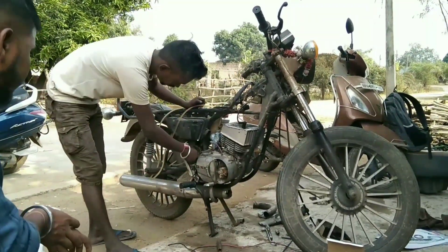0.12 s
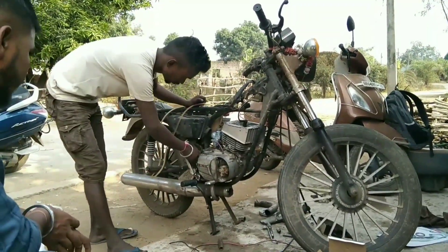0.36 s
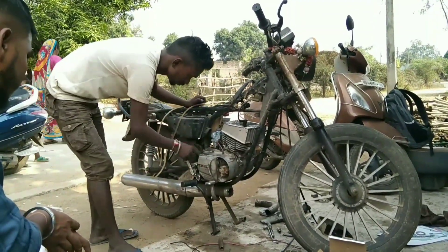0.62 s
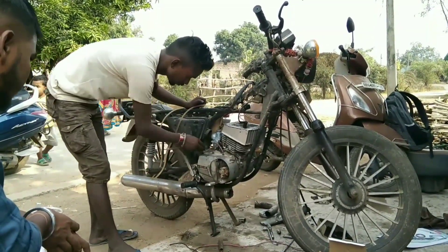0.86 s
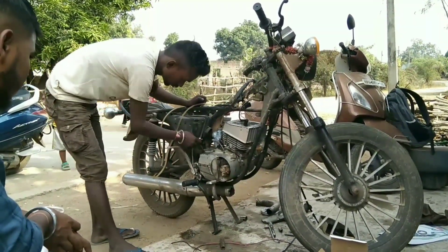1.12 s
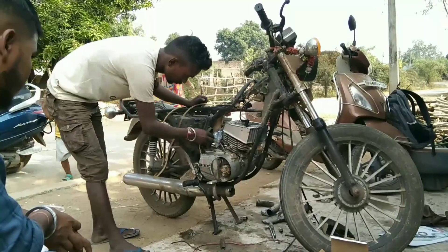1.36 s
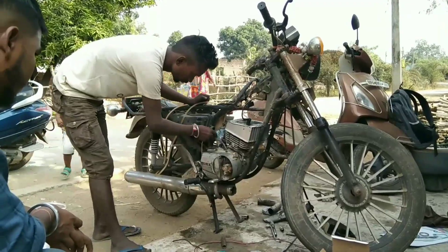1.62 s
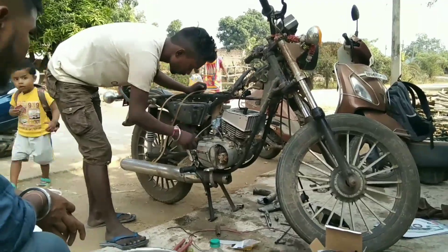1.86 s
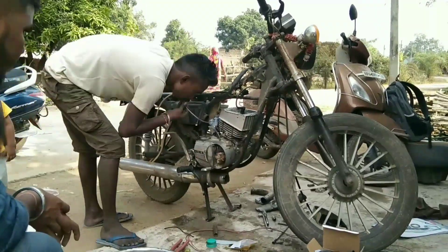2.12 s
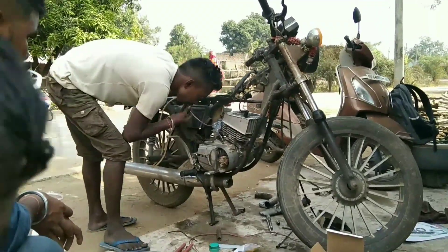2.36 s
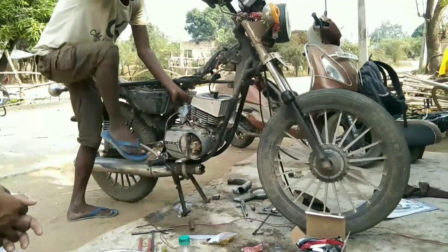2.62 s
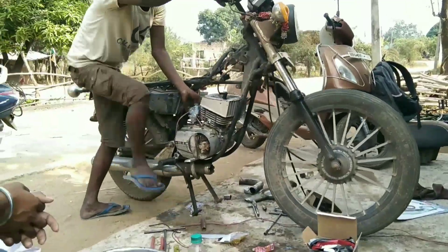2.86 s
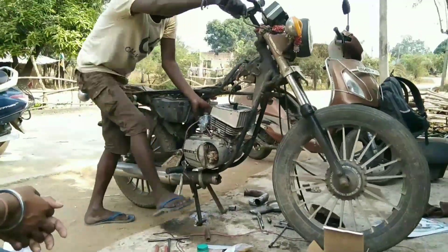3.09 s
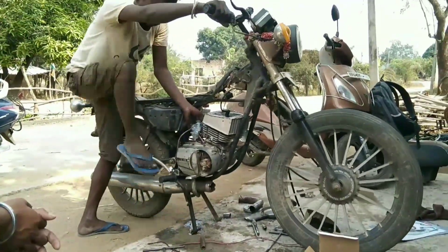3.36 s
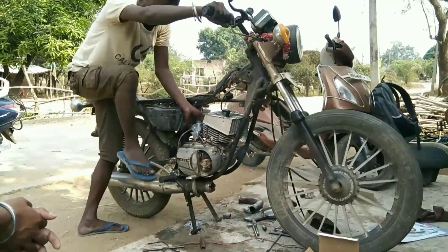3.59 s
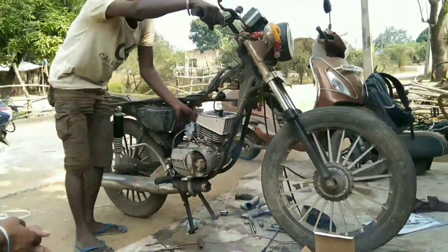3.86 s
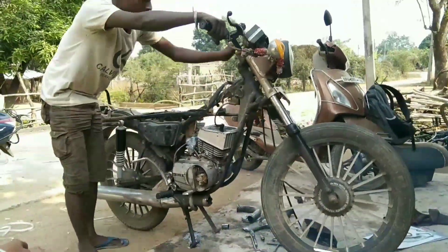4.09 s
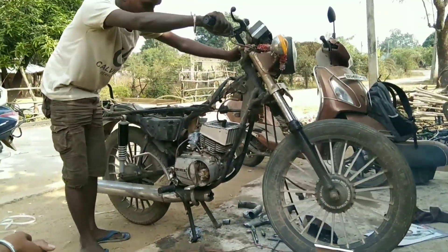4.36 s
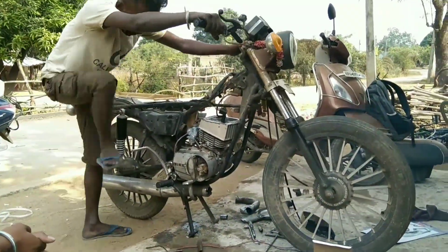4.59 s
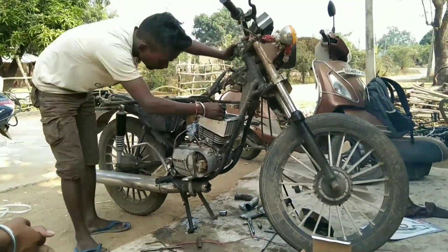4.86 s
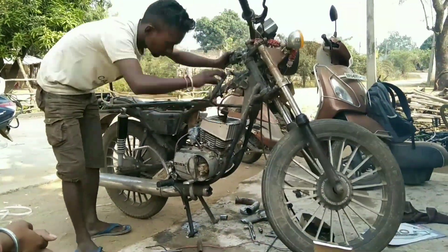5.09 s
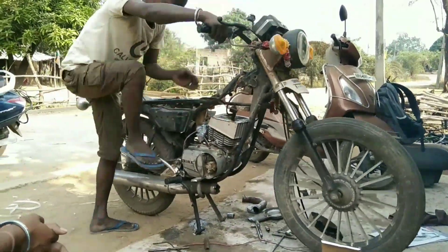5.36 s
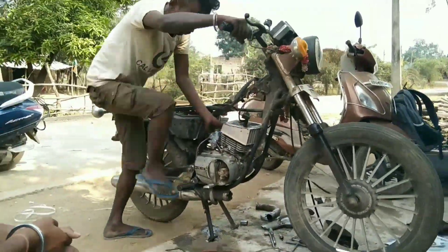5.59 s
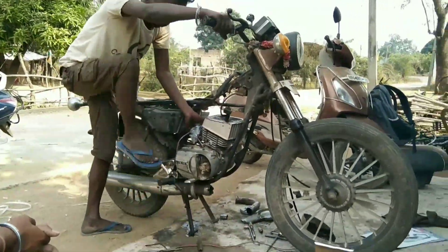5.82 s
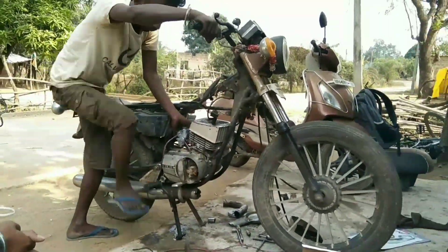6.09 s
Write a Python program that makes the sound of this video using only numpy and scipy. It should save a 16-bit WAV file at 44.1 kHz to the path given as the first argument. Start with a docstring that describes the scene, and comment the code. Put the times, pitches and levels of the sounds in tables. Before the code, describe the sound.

Close, nearly mono phone pickup outdoors: sandy scraping and light tinkling over faint traffic rumble, then metallic kick clacks and soft exhaust puffs. Uneven barking pops bunch together into a brief, very loud two-stroke buzz, which loses its firing suddenly and slows through hollow puffs and clatter. The yard is quiet again with a few scuffs and a small squeak, before further knocking kicks with a weak misfire but no start.

```python
"""Scuffs and small metal jingles close by in an open yard, over distant traffic rumble; then kicks on an engine.
A single-cylinder two-stroke on its stand pops, catches, revs up, coasts to a stop and is kicked again.
Blasts are gliding whistles and impulses through exhaust resonances; puffs, knocks and bells are decaying rings.
Rattle, scuffs, traffic and hiss are shaped noise; the short squeaks are unsteady partials.
All reaches a nearly mono phone microphone, with a short echo of the engine from the ground."""
import sys
import numpy as np
from scipy import signal
from scipy.fft import rfft, irfft, next_fast_len
from scipy.io import wavfile
from scipy.ndimage import uniform_filter1d, map_coordinates

SR = 44100
rng = np.random.default_rng(int(sys.argv[2]) if len(sys.argv) > 2 else 0)


def undo_db(level):
    """Turn decibels back into plain size, where 20 dB means ten times bigger."""
    steps = np.asarray(level, float) / 20
    return 10 ** steps


def file_out(sig):
    """Save sig as 16-bit WAV at sys.argv[1]."""
    # one column per channel
    cols = np.atleast_2d(sig).T
    # limit, then scale
    lim = np.clip(cols, -1, 1)
    pcm = np.round(lim * 32767).astype(np.int16)
    wavfile.write(sys.argv[1], SR, pcm)


N = 273861
T = np.arange(SR // 8) / SR  # time inside one short sound, s
CLOCK = np.arange(N) / SR  # time in the whole scene, s

# Single pops from the exhaust before and around the catch, and in the last kick.
# Each row: start in seconds, relative bark level in dB, bark pitch in Hz, bark length in seconds,
# relative puff level in dB.
POPS = [(3.4907, -10, 1555, 0.0068, -3.5), (3.582, -11, 1840, 0.0046, -4.5), (3.654, -6, 1470, 0.0021, -5),
        (3.6814, -5, 1640, 0.0025, -12.5), (3.7017, -6, 1920, 0.0032, -7.5), (3.723, -2, 1855, 0.0027, -14),
        (3.7576, -5, 1950, 0.0023, -11), (3.787, -5, 1810, 0.0033, -8), (3.816, -6, 1850, 0.0026, -5),
        (3.8444, -6.5, 1900, 0.0027, -12.5), (3.858, -9.5, 2050, 0.0043, -6),
        (5.672, -8, 1544, 0.0058, -8.5), (5.72, -15, 2050, 0.0046, -8.5)]
CUT_S, STALL_S = 4.078, 4.295  # the ignition is cut; after the stall the last slow turns give no running puffs


def engine():
    """Exhaust and intake over the rattle of the case; each blast throws a spray of treble."""
    # Rattle colour of the case. Each row: frequency in Hz, relative level in dB.
    case = [(120, -1), (200, 5), (228, -6.5), (320, 6.5), (518, -7.5), (613, -10), (775, -9), (1020, -9.5),
            (1900, -9.5), (2570, -12.5), (2850, -14), (3330, -22), (4500, -68), (5850, -61.5), (9900, -120)]
    # Turbulent exhaust gas. Each row: frequency in Hz, relative level in dB.
    churn = [(150, -31), (300, -5), (520, -5.5), (800, -6.5), (1050, -9.5), (1500, -5), (2000, -3),
             (2800, -5.5), (3400, -14), (4500, -38.5), (9900, -120)]
    # Treble of the engine. Each row: frequency in Hz, relative level in dB.
    treble = [(2240, -54), (3800, -10), (5520, -17), (6850, -13), (10300, -18), (12000, -14),
              (15500, -25.5)]
    wake_s = 0.0087  # life of the churn after a blast
    kick, kick_blast = kicked()
    run, run_blast = running()
    rattle_db, treble_db = rattle_levels()
    # teeth and rings strike in clumps
    clumps = unit(np.convolve(rng.standard_normal(N), np.hanning(64), "same"))
    grains = unit(undo_db(1.65 * clumps))

    # while it fires, the gas drowns the low knock of the case
    firing = (CLOCK > POPS[3][0]) & (CLOCK < STALL_S)
    colour = np.where(firing, noise(churn, patchy_db=5.5), noise(case, patchy_db=5.5))
    rattle = undo_db(rattle_db) * grains * colour
    gas = 0.05 * kick_blast * noise(churn, patchy_db=1.5)
    # hot gas goes on churning in the pipe
    decay = np.exp(-T / wake_s) / (wake_s * SR)
    wake = np.convolve(kick_blast + 0.35 * run_blast, decay)[:N]
    gas = gas + 0.065 * wake * noise(churn, patchy_db=4)

    spray = undo_db(treble_db - 6.5) * (grains + 5 * kick_blast + 3 * run_blast)
    bright = spray * noise(treble, patchy_db=1.5)
    aside = spray * noise(treble, patchy_db=3)
    # the pipe and the heavy parts give little treble
    dull = filtered(kick + run, lambda hz: (1 + 1j * hz / 4200) ** -4)
    motor = dull + rattle + gas + drags() * grains + bright
    return motor, aside + undo_db(rattle_db - 20.5) * noise(case, patchy_db=15.5)


def running():
    """One port opening a turn: a firing rings the pipe, an unfired turn puffs; the intake rings later in the turn."""
    # Crank speed once the engine fires on every turn. Each row: time in seconds, speed in turns per second.
    crank = [(3.8447, 71.9), (3.93, 75.7), (4.01, 78.8), (4.08, 76.5), (4.14, 69.0), (4.2, 59.1),
             (4.26, 43.0), (4.31, 40), (4.335, 26), (4.345, 19), (4.39, 20), (4.415, 14)]
    # Turns with a poor charge, counted from 0.
    weak_turns = [0, 1, 2, 9, 18]
    weak_db = -8
    fire_start_db, fire_dies_db_per_s = -9.5, 597
    pipe_dies_db_per_s = 60  # hot gas rings the pipe for some turns more
    puff_fired_db, puff_coast_db, puff_grows_s = -22.5, -1.5, 0.15  # the unfired puff takes over after the cut
    puff_hz, puff_hz_per_turn = 85, 3.4  # a faster port gives a shorter slug; rise per turn/s
    intake_fired_db, intake_coast_db, intake_fades_db_per_s = -25.5, -14, 9
    intake_db_per_turn, slow_turns_per_s = 4.2, 41.6  # a slow crank sucks weakly; dB per missing turn/s
    intake_lag_turns, intake_attack_s = .41, .0012

    speed = curves(crank, 0)[0]
    angle = np.cumsum(speed) / SR
    since = np.maximum(CLOCK - CUT_S, 0)
    coast = np.clip(since / puff_grows_s, 0, 1)
    fire_db = fire_start_db - fire_dies_db_per_s * since
    puff_db = puff_fired_db + (puff_coast_db - puff_fired_db) * np.sqrt(coast)
    intake_db = np.where(since > .012, intake_coast_db - intake_fades_db_per_s * since, intake_fired_db)
    intake_db = intake_db - intake_db_per_turn * np.maximum(slow_turns_per_s - speed, 0)
    turns = np.arange(int(angle[-1]) + 1)
    opens = np.searchsorted(angle, turns + 1e-6)
    sucks = np.searchsorted(angle, turns + intake_lag_turns)
    size_db = fire_db[opens] + weak_db * np.isin(turns, weak_turns) + rng.normal(0, 1.0, len(turns))

    out, fires, blast = np.zeros(N), np.zeros(N), np.zeros(N)
    for i, db in zip(opens, size_db):
        s = i / SR
        add(out, s - .0002, undo_db(db + 3) * bark(1740, .0015, rough=.015, attack=.00012))
        # the blast's higher second half
        add(out, s + 0.0014, -undo_db(db - 5) * bark(2200, .0026, rough=.03, attack=.00012))
        # the slow push of the charge
        add(out, s + 0.0004, undo_db(db - 8.5) * np.hanning(150))
        pipe_db = db + 11.5 + (fire_dies_db_per_s - pipe_dies_db_per_s) * since[i]
        add(fires, s + .0001, undo_db(pipe_db) * np.hanning(11))
        if i < STALL_S * SR:
            slug = puff(puff_hz + puff_hz_per_turn * speed[i], cycles=7.1)
            add(out, s, undo_db(puff_db[i] - 2.5) * slug)
        # the suction wave comes back from the cone
        add(out, s + 0.00387, -undo_db(db - 11.5) * np.hanning(44))
        add(blast, s, undo_db(db + 6) * (T / .0011) * np.exp(1 - T / .0011))
    for i in sucks[sucks < STALL_S * SR]:
        gulp = ring(rng.normal(1490, 10), 0.015, intake_attack_s) + 0.13 * ring(2840, 0.06, 0.003)
        add(out, i / SR, undo_db(intake_db[i] + 9.5 + rng.normal(0, 1)) * gulp)
    out = out + filtered(fires, pipe)
    return filtered(out, lambda hz: (1j * hz / (70 + 1j * hz)) ** 2), blast


def kicked():
    """Pops, puffs and knocks, with the gate that each pop and knock puts on the gas noise."""
    pop, pop_blast = single_pops()
    knock, knock_blast = knocks()
    return pop + unfired_puffs() + knock, pop_blast + knock_blast


def single_pops():
    """A lone firing whistles at the outlet, rings the pipe and puffs; its wave runs the pipe and comes out again."""
    return_s = .0185
    out, blast, fires = np.zeros(N), np.zeros(N), np.zeros(N)
    for s, db, hz, length, puff_db in POPS:
        add(out, s, undo_db(db) * bark(hz, length, rough=.035, attack=.00012))
        add(out, s + 0.004, undo_db(puff_db) * puff(300, cycles=5))
        add(out, s + return_s, undo_db(db - 9) * puff(340, cycles=4))
        add(fires, s + 0.00027, undo_db(db + 7) * np.hanning(11))
        add(blast, s, undo_db(db + 18.5) * (T / 0.0032) * np.exp(1 - T / 0.0018))
    return out + filtered(fires, pipe), blast


def unfired_puffs():
    """Gas pushed out without a firing: low swings, repeated more weakly as they return through the pipe."""
    # Puffs while kicked over and near the stop. Each row: time in seconds, relative level in dB, pitch in Hz.
    puff_rows = [(2.565, -15, 156), (2.566, -12, 323), (2.592, -30, 245), (2.745, -23.5, 364),
                 (2.775, -38, 326), (2.722, -20, 172), (2.91, -23.5, 188), (2.952, -22.5, 325),
                 (3.073, -30.5, 297), (3.095, -23.5, 176), (3.146, -29, 137), (3.222, -37.5, 153),
                 (3.283, -28.5, 260), (3.358, -39.5, 200), (3.44, -21, 165), (3.463, -17, 282),
                 (3.54, -13, 166), (3.564, -14.5, 288), (3.617, -16, 174), (4.304, -16, 228),
                 (4.33, -13.5, 179), (4.378, -14, 332), (4.383, -14, 197), (5.725, -16.5, 192),
                 (4.411, -27.5, 183), (5.643, -37.5, 173), (5.693, -12, 348), (5.997, -31.5, 199),
                 (5.928, -14.5, 186), (5.93, -25.5, 373), (6.145, -11, 191), (6.148, -27, 375)]
    swell_s = 0.00493  # a slowly opened port lets the puff build up over its first swings
    return_s, return_db = .026, -12.5  # delay and loss of each return
    thump_hz, thump_db = 107.2, -2  # the piston's slow push under each puff
    out = np.zeros(N)
    for s, db, hz in puff_rows:
        for k in range(3):
            slug = puff(hz, cycles=7.87, attack=swell_s)
            add(out, s - swell_s + k * return_s, undo_db(db + 11.0 + k * return_db) * slug)
        add(out, s - swell_s, undo_db(db + thump_db) * ring(thump_hz, 0.089, swell_s))
    return out


def knocks():
    """A blow on the kick lever or gears, or a weak unfired pop, rings the metal modes nearest its pitch, with a
    short crack."""
    # Knocks: blows on the kick lever or gears, and weak unfired pops ringing the same metal. Each row: time in
    # seconds, relative level in dB, pitch of the blow in Hz.
    knock_rows = [(2.452, -34, 1900), (2.515, -32, 2890), (2.543, -22, 1345), (2.5523, -15, 2440),
                  (2.5645, -4, 1900), (2.586, -9.5, 2050), (2.602, -26, 2800), (2.74, -15.5, 1345),
                  (2.793, -32, 1345), (2.8903, -22, 1430), (2.9168, -14.5, 1050), (2.968, -15.5, 2050),
                  (3.076, -17.5, 1345), (3.1032, -17, 1050), (3.1127, -9, 2890), (3.2545, -24, 1050),
                  (3.28, -20.5, 1500), (3.3, -13, 2890), (3.461, -3.5, 1420), (3.541, -9, 2290),
                  (4.1508, -11.5, 845), (4.305, -7.5, 2290), (4.329, -9.5, 2050), (4.3545, -11, 1500),
                  (4.378, -7, 2070), (4.431, -30.5, 2890), (4.7476, -34, 1050), (5.0816, -24.5, 1500),
                  (5.647, -11.5, 1500), (5.688, -7.5, 2050), (5.692, -19, 2890), (5.707, -9.5, 1500),
                  (5.7396, -13, 1500), (5.925, -3.5, 2290), (5.95, -11, 1500), (5.9768, -12.5, 1500),
                  (6.143, -2, 2390), (6.169, -9, 1500)]
    # Modes of the kick lever and gear case. Each row: frequency in Hz, relative level in dB, t60 in seconds.
    gear_modes = [(845, -1.5, 0.056), (1050, 1, 0.0089), (1345, 1.5, 0.017), (1500, -1.5, 0.016),
                  (1900, -3.5, 0.017), (2050, 6.5, 0.013), (2290, -4, 0.0087), (2450, -5, 0.02),
                  (2920, -34.5, 0.063), (2890, 1, 0.033)]
    aim_db_per_octave = 110  # a blow favours the modes near its own pitch
    out, blast = np.zeros(N), np.zeros(N)
    for s, db, hz in knock_rows:
        grit = .9 + .3 * stepped(30)  # sliding contact
        modes = np.zeros(len(T))
        for f, level, t60 in gear_modes:
            aimed_db = level - aim_db_per_octave * abs(np.log2(f / hz))
            modes += undo_db(aimed_db) * ring(f, t60, 0.0027)
        add(out, s, undo_db(db + 2.5) * modes * grit)
        crack = undo_db(-60 * T / 0.042) * (1 - np.exp(-T / 0.0037)) * rng.standard_normal(len(T))
        add(out, s, undo_db(db - 10.0) * crack)
        add(blast, s, undo_db(db + 8) * (T / 0.0033) * np.exp(1 - T / 0.0017))
    return out, blast


def rattle_levels():
    """Rattle and treble in dB: every slow stroke rises, holds and falls alike; the running engine follows its work."""
    # How hard the engine works from the catching kick to the stop.
    # Each row: time in seconds, relative rattle level in dB.
    work = [(3.4, -79.5), (3.44, -35), (3.5, -31.5), (3.59, -20.5), (3.7, -28.5), (3.85, -29), (4.05, -30),
            (4.15, -31), (4.18, -35.5), (4.3, -32.5), (4.36, -32), (4.39, -35.5), (4.42, -40), (4.46, -57)]
    # Slow compression strokes drag gears and rings and push gas.
    # Each row: time in seconds, relative rattle level in dB, hold in seconds, treble under rattle in dB.
    strokes = [(2.553, -27.5, 0.004, 28.5), (2.581, -42, 0.014, 14), (2.72, -34, 0.049, 23.5),
               (2.897, -37.5, 0.058, 22.5), (3.107, -29, 0.0044, 13.5), (3.289, -34, 0.023, 14),
               (5.68, -20.5, 0.02, 24.5), (5.753, -40, 0.022, 22), (5.93, -36.5, 0.036, 19),
               (5.98, -50.5, 0.027, 13), (6.148, -30, .02, 22.5)]
    rise_db_per_s, fall_db_per_s = 605, 366
    treble_drop = 1.6  # dB of treble lost for each dB the rattle is under its peak
    work_dull_db, coast_dull_db = 17.5, 4.5  # treble lies under the work, more so after the cut
    work_db, = curves(work, -99)
    levels = [[work_db, work_db - work_dull_db - coast_dull_db * (CLOCK > CUT_S)]]
    for s, db, hold, under_db in strokes:
        drop_db = rise_db_per_s * np.maximum(s - CLOCK, 0)
        drop_db = drop_db + fall_db_per_s * np.maximum(CLOCK - s - hold, 0)
        levels.append([db - drop_db, db - under_db - treble_drop * drop_db])
    return np.max(levels, axis=0)


def drags():
    """The kick pawl bites before a stroke: each bite starts at once, grinds for a moment and fades."""
    # Bites of the pawl. Each row: start in seconds, relative level in dB, fading time in seconds.
    bites = [(2.696, -45, 0.038), (2.874, -67, 0.013), (3.424, -37.5, 0.056), (5.607, -40.5, 0.014),
             (5.896, -44.5, 0.045), (6.108, -38.5, 0.028)]
    # Colour of the grinding. Each row: frequency in Hz, relative level in dB.
    pawl = [(600, -32), (1100, -4), (2400, -4.5), (3500, -5), (4500, -33), (9000, -47), (16000, -46)]
    gate = np.zeros(N)
    for s, db, length in bites:
        add(gate, s, undo_db(db) * (1 - np.exp(-T / .001)) * np.exp(-np.square(T / length)))
    return gate * noise(pawl, patchy_db=3.5)


def puff(hz, cycles=6, attack=0.00096):
    """A slug of gas leaves the pipe: two decaying low swings sounding together."""
    return ring(hz, cycles / hz, attack) + .65 * ring(hz * 0.637, cycles / hz, 2 * attack)


def bark(hz, length, rough, attack):
    """The outlet whistles while the blast passes, then is choked off."""
    rises_per_s = 18  # share of pitch gained a second
    glide = np.cumsum(hz * (1 + rises_per_s * T + rough * stepped(20))) / SR
    choked = .15 * np.exp(-(T - length) / .0014)
    gate = (1 - np.exp(-T / attack)) * np.where(T < length, 1, choked)
    return gate * (np.sin(2 * np.pi * glide) + 0.3 * np.sin(2 * np.pi * 1.43 * glide))


def pipe(f):
    """Response of the hot exhaust: resonances of alternating sign."""
    # Resonances of the pipe. Each row: frequency in Hz, width in Hz, relative level in dB.
    resonances = [(349, 57, 10), (530, 48, 3.5), (813, 72, 10), (1310, 41, -5.5), (1850, 150, -23),
                  (2270, 61, -1.5), (2800, 180, -18)]
    total = 0
    for k, (centre, width, db) in enumerate(resonances):
        total = total + (-1) ** k * undo_db(db) * 1j * f * width / (centre ** 2 - f * f + 1j * f * width)
    return total


def ground(x):
    """A short diffuse answer from the ground, parked machines and trees, thin in the bass."""
    tail = rng.standard_normal(len(T)) * undo_db(-60 * T / 0.07)
    delayed = np.pad(tail / np.linalg.norm(tail), (120, 0))  # 120 samples late
    echo = signal.fftconvolve(x, delayed)[:N]
    return filtered(echo, lambda hz: 1j * hz / (400 + 1j * hz))


def scuffs():
    """Steps scrape on gritty ground: uneven noise in a band, with a fine sandy top, swelling and fading."""
    # Scuffs close by. Each row: start in seconds, relative level in dB, centre in Hz, length scale in seconds.
    scuff_rows = [(0.016, -23.5, 3300, 0.056), (0.56, -51, 7000, .03), (0.837, -49, 6000, 0.027),
                  (1.098, -56, 6440, 0.023), (1.604, -52, 8100, 0.037), (0.67, -24.5, 2880, 0.042),
                  (0.749, -42.5, 3380, 0.087), (0.883, -33, 3680, 0.064), (0.977, -35, 3000, 0.03),
                  (1.017, -31, 3240, 0.053), (1.171, -26, 3700, 0.032), (1.273, -23, 2900, 0.046),
                  (1.386, -19.5, 2590, 0.011), (1.398, -26, 2450, 0.018), (1.654, -28.5, 2940, 0.046),
                  (1.707, -32, 3130, 0.084), (1.493, -37, 3170, 0.032), (1.814, -28, 1050, 0.074),
                  (1.817, -25.5, 2680, 0.086), (4.49, -35.5, 2270, 0.073), (4.717, -56, 2470, 0.29),
                  (4.956, -32, 2500, 0.077), (5.35, -35, 2030, 0.027), (5.474, -40, 2060, 0.17)]
    sand_db = -14.5  # the fine top, under the body
    out = np.zeros(N)
    t = T[:96]
    for s, db, hz, length in scuff_rows:
        grit = rng.standard_normal(len(T)) * undo_db(4.5 * stepped(40))
        grain = np.sin(2 * np.pi * hz * t) * (t * hz) ** 2 * np.exp(-t * hz * 3)
        body = unit(np.convolve(grit, grain)[:len(T)])
        sand = unit(np.convolve(grit, np.ones(3), "same"))
        swell = np.square(T / (0.42 * length) * np.exp(1 - T / (0.31 * length)))
        add(out, s, undo_db(db - 18.5) * unit(body + undo_db(sand_db) * sand) * swell)
    return out


def jingles():
    """Small metal parts ring like bells, clearly or in faint random tinkles with shaken grit under them."""
    # The clearest jingles. Each row: start in seconds, relative level in dB, which bell counted from 0.
    clear = [(.026, -40, 2), (.028, -44, 3), (.676, -44, 2), (.678, -46, 3), (.68, -46, 4), (.6216, -62, 5),
             (1.197, -56, 1), (1.42, -52, 1), (1.448, -60, 2), (1.602, -60, 5), (1.9865, -48, 1),
             (5.116, -60, 5), (5.14, -62, 5), (1.818, -47, 0), (1.84, -50, 1), (1.86, -52, 2),
             (1.908, -50, 2), (2.005, -44, 0), (2.008, -50, 2), (2.053, -48, 0), (2.082, -45, 1)]
    # Pitches of the small metal. Each row: frequency in Hz, t60 in seconds.
    bells = [(7600, 0.051), (7940, 0.036), (9620, 0.039), (6320, 0.031), (10200, 0.019), (8550, 0.047)]
    # Stretches of faint tinkling. Each row: start in seconds, end in seconds, relative level in dB.
    stretches = [(.8, .95, -72), (1.08, 1.22, -72), (1.4, 1.52, -70), (1.72, 2.02, -61), (2.08, 2.2, -68),
                 (2.21, 2.29, -64), (2.33, 2.38, -66), (5.17, 5.3, -70)]
    # Grit shaken with the bells. Each row: frequency in Hz, relative level in dB.
    rustle = [(5000, -38), (6800, -8.5), (8000, 8), (9600, -3), (11500, -17.5), (16000, -41)]
    tinkles_per_s, rustle_db = 30, -11.5
    faint, swells = [], np.zeros(N)
    for a, b, db in stretches:
        for u, v, w in rng.random((60, 3))[:int(tinkles_per_s * (b - a))]:
            faint.append((a + (b - a) * u, db - 10 * v, int(w * 3)))
        swells += undo_db(db + rustle_db) * np.sin(np.pi * np.clip((CLOCK - a) / (b - a), 0, 1))
    out = noise(rustle, patchy_db=4) * undo_db(5 * wobble(30)) * swells
    for s, db, bell in clear + faint:
        add(out, s, undo_db(db) * ring(*bells[bell], 0.0018) * shake())
    return out


def shake():
    """Loose metal chatters: an uneven gain inside one jingle."""
    return 1 + .6 * np.interp(T, np.arange(200) * .0007, rng.standard_normal(200))


def near_squeak():
    """One near squeak whose pitch climbs, jumps and sags: three unsteady partials."""
    # Its course. Each row: time in seconds, pitch in Hz, then relative levels in dB of tone, octave, third partial.
    squeak = [(4.962, 1450, -70, -65, -80), (4.966, 1550, -52, -40, -70), (4.972, 1750, -50, -48, -62),
              (4.9745, 2000, -55, -60, -62), (4.9755, 2750, -39, -65, -70), (4.979, 2500, -39, -68, -66),
              (4.986, 2420, -36, -66, -63), (4.993, 2250, -40, -63, -67), (5.001, 1850, -52, -62, -75),
              (5.004, 1150, -52, -80, -90), (5.022, 1050, -62, -80, -90)]
    hz, *partials_db = curves(squeak, -120)
    phase = 2 * np.pi * np.cumsum(hz * (1 + .03 * wobble(1200))) / SR
    tone = sum(undo_db(db) * np.sin((k + 1) * phase) for k, db in enumerate(partials_db))
    return undo_db(0.71 * wobble(430)) * tone


def faint_squeaks():
    """Farther squeaks, faint and unsteady, with overtones."""
    # Each row: start in seconds, length in seconds, pitch in Hz, relative level in dB.
    faint_rows = [(0.763, 0.072, 1925, -58), (0.86, 0.028, 2580, -57), (1.279, 0.015, 2180, -44),
                  (1.315, 0.12, 1900, -60), (1.401, 0.014, 2330, -39.5), (1.933, 0.086, 860, -56),
                  (1.935, 0.072, 2910, -51), (2.02, 0.082, 2650, -60), (4.754, 0.076, 2920, -57.5)]
    best_hz, db_per_octave = 3400, 12  # partials near this pitch carry best
    out = np.zeros(N)
    drift, flutter, waver_db = wobble(60), wobble(1200), 4 * wobble(150)
    for s, length, hz, db in faint_rows:
        now = slice(round(s * SR), round(s * SR) + len(T))
        phase = 2 * np.pi * np.cumsum(hz * (1 + .012 * drift[now] + .05 * flutter[now])) / SR
        tone = np.zeros(len(T))
        for k in range(1, 5):
            if k * hz < 4000:
                tone += undo_db(-db_per_octave * abs(np.log2(k * hz / best_hz))) * np.sin(k * phase)
        swell = np.sqrt(np.abs(np.sin(np.pi * np.clip(T / length, 0, 1))))
        add(out, s, undo_db(db + waver_db[now]) * swell * tone)
    return out


def yard():
    """Distant traffic rumble and yard hiss as wavering noise; after the run the hiss sounds in bands."""
    # Distant traffic. Each row: time in seconds, relative level in dB.
    traffic = [(0, -50.5), (.05, -39.5), (.24, -44), (.32, -50.5), (1.04, -51.5), (1.6, -54), (1.75, -47),
               (2.05, -53), (2.4, -51.5), (4.45, -48), (4.8, -47.5), (5.05, -49.5), (5.4, -53), (5.55, -49),
               (6.21, -47)]
    # Traffic colour. Each row: frequency in Hz, relative level in dB.
    rumble = [(15, -85.5), (25, -24), (43, -9.5), (83, -6), (118, 3), (146, -4), (184, -12), (400, -24),
              (520, -61.5), (880, -120)]
    # Hiss colour up to the end of the run. Each row: frequency in Hz, relative level in dB.
    early_hiss = [(150, -23), (250, -8), (660, -6), (1670, -9.5), (3060, -7.5), (3900, -11.5), (4300, -33),
                  (4700, -58), (8000, -77.5), (16000, -75)]
    # Hiss after the engine has run. Each row: time in seconds, relative level in dB.
    late_hiss = [(4.44, -60.5), (4.6, -58.5), (4.78, -59.5), (4.9, -65), (5.15, -65), (5.3, -63),
                 (5.45, -65), (5.48, -54.5), (5.6, -62), (5.85, -65.5), (6.05, -75), (6.21, -65)]
    # Its colour, bands with holes between. Each row: frequency in Hz, relative level in dB.
    banded = [(200, -4.5), (420, -0.5), (570, -12.5), (780, 2), (1100, -9), (1410, -1), (1800, -9.5),
              (2320, -3.5), (2650, -9.5), (2980, -1.5), (3500, -13), (4000, -22.5), (4500, -60),
              (16000, -73)]
    level_db, = curves(traffic, None)
    out = undo_db(level_db + 1.5 * wobble(14)) * noise(rumble, patchy_db=2.5)
    early = np.arange(N) < late_hiss[0][0] * SR
    out = out + early * undo_db(level_db - 11.5) * noise(early_hiss, patchy_db=2.5)
    return out + undo_db(curves(late_hiss, -120)[0]) * noise(banded, patchy_db=6.0)


def unit(x):
    """Scale to rms 1."""
    return x / np.sqrt(np.mean(x ** 2) + 1e-20)


def curves(rows, outside):
    """One value per sample for each column after the time."""
    s, *cols = np.transpose(rows)
    return [np.interp(CLOCK, s, c, left=outside, right=outside) for c in cols]


def filtered(x, response):
    """x times a complex response of frequency."""
    m = next_fast_len(N + 8192)
    return irfft(rfft(x, m) * response(np.fft.rfftfreq(m, 1 / SR)), m)[:N]


def noise(spectrum, patchy_db):
    """Coloured noise of rms 1 with patches of random gain in time and frequency."""
    z = signal.stft(rng.standard_normal(N), nperseg=512)[2]
    field = uniform_filter1d(rng.standard_normal(z.shape), size=5, axis=0)
    field = uniform_filter1d(field, size=8, axis=1)
    x = signal.istft(z * undo_db(patchy_db * unit(field)), nperseg=512)[1][:N]
    f, db = np.transpose(spectrum)
    return unit(filtered(x, lambda hz: undo_db(np.interp(np.log(hz + 1), np.log(f + 1), db))))


def stepped(hold):
    """Random values, each held for some samples, over one short sound."""
    return rng.standard_normal(len(T) // hold + 1).repeat(hold)[:len(T)]


def wobble(rate):
    """A smooth random curve, rate knots a second."""
    knots = rng.standard_normal(int(N * rate / SR) + 4)
    return map_coordinates(knots, [np.arange(N) * rate / SR])


def ring(hz, t60, attack):
    """A struck resonance: a decaying sine with a soft start."""
    return np.sin(2 * np.pi * hz * T) * undo_db(-60 * T / t60) * (1 - np.exp(-T / attack))


def add(track, s, sound):
    """Mix a short sound in at time s."""
    part = track[round(s * SR):][:len(sound)]
    part += sound[:len(part)]


def scene():
    """Engine with its echo over the yard; the two sides differ a little, mostly in the treble."""
    motor, spread = engine()
    near = scuffs() + jingles() + near_squeak() + faint_squeaks()
    self_noise = undo_db(-93) * rng.standard_normal(N)  # the microphone's own hiss
    mid = motor + undo_db(-15) * ground(motor) + near + yard() + self_noise
    return mid + undo_db(-10.5) * np.outer([1, -1], spread)


def top_cut(x):
    """Nothing passes above the cut-off."""
    return signal.sosfilt(signal.butter(12, 16480, fs=SR, output="sos"), x)


def record(dry):
    """The microphone drops the deep bass; the loudest pops are softly clipped."""
    thin = np.array([filtered(side, lambda hz: (1j * hz / (55 + 1j * hz)) ** 3) for side in dry])
    return top_cut(np.tanh(thin * 1.348))


dry = scene()
out = record(dry)
file_out(out)
```